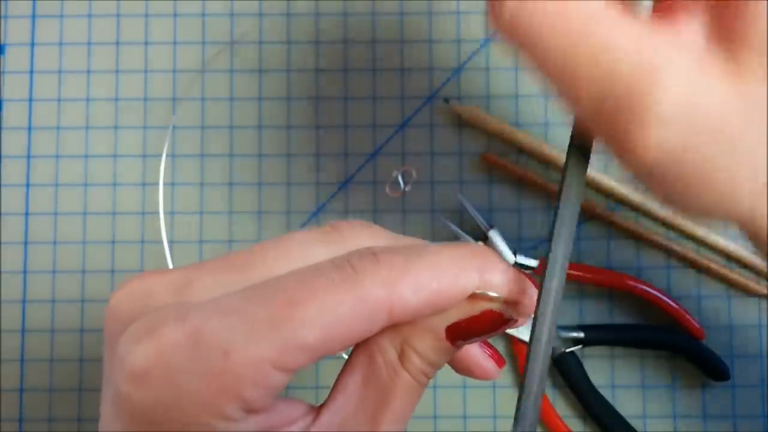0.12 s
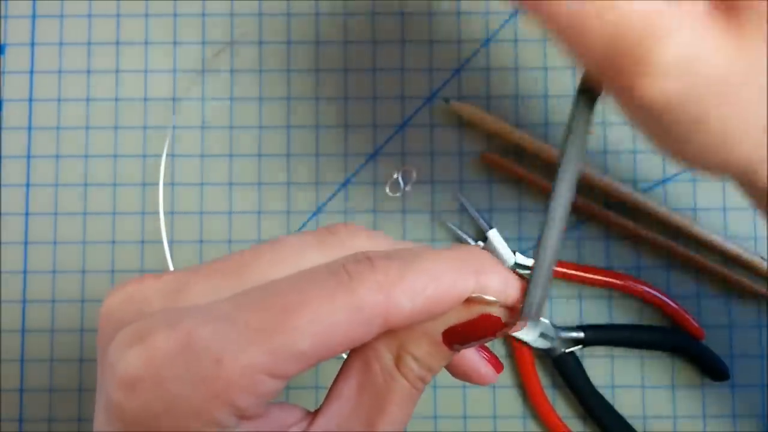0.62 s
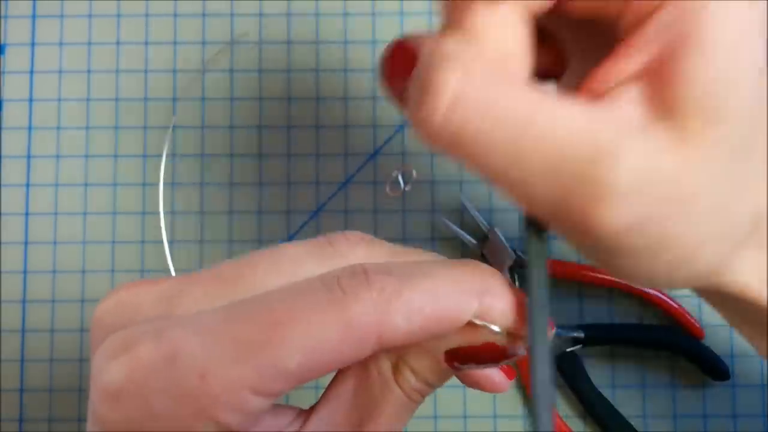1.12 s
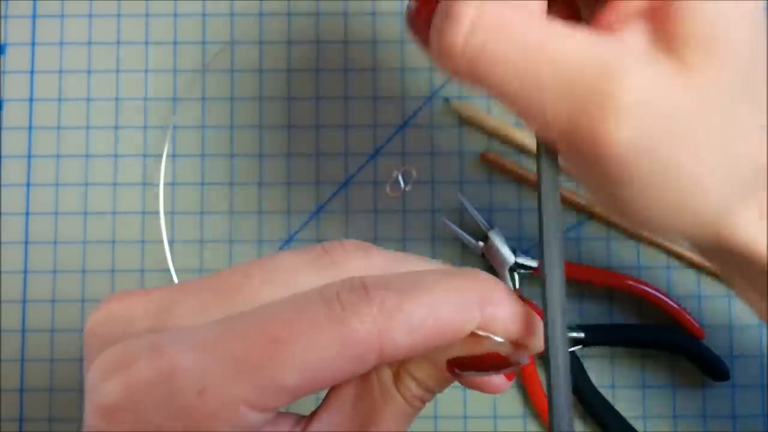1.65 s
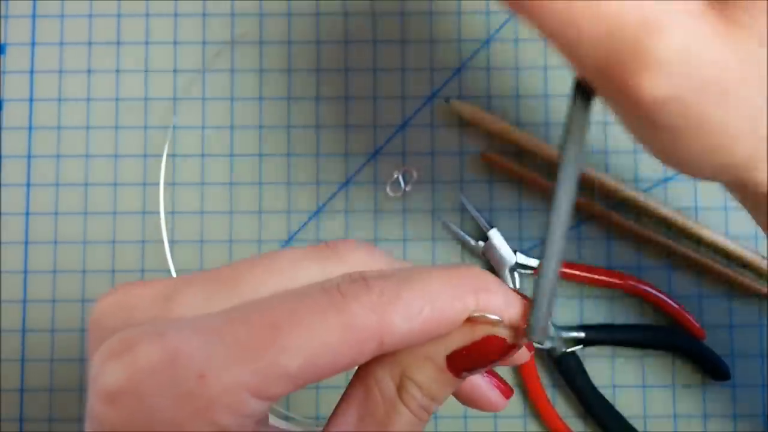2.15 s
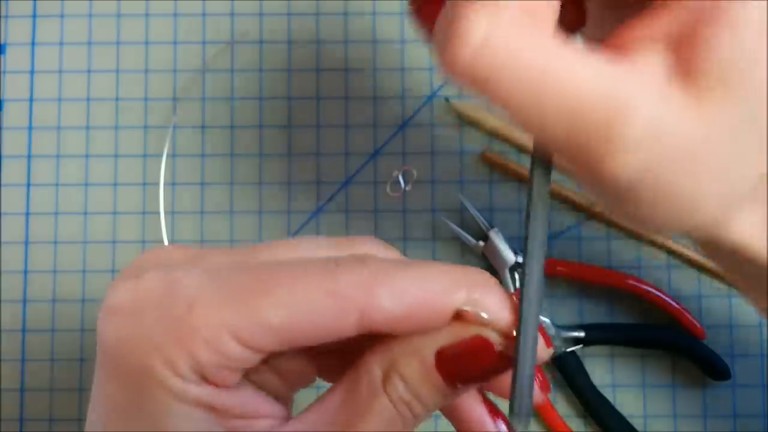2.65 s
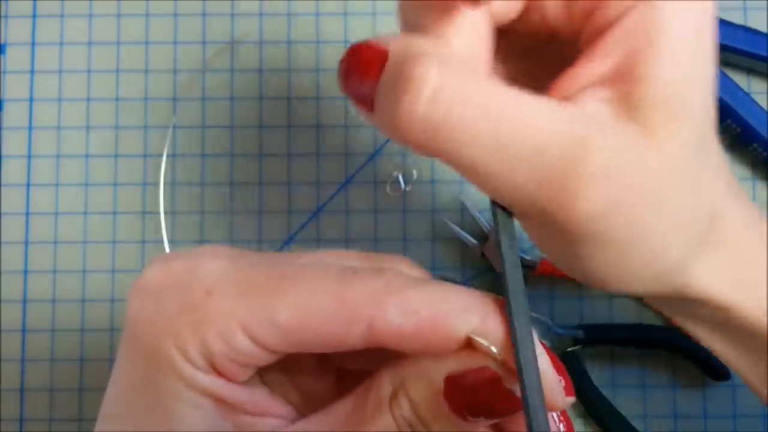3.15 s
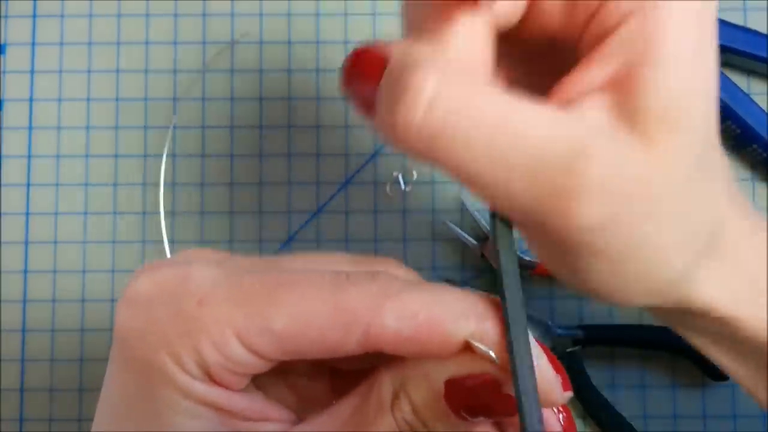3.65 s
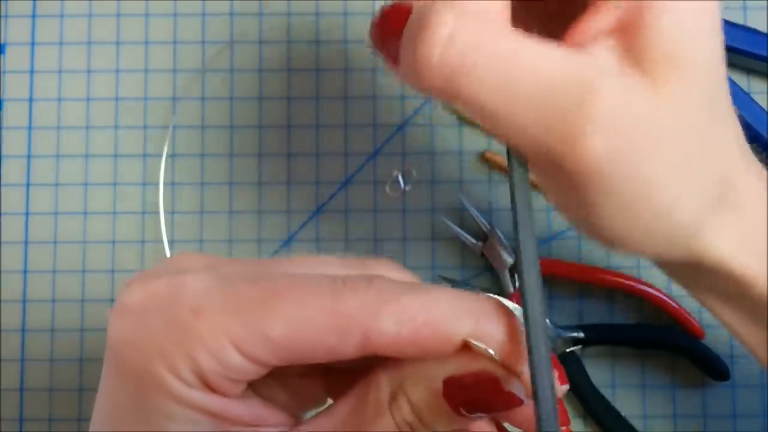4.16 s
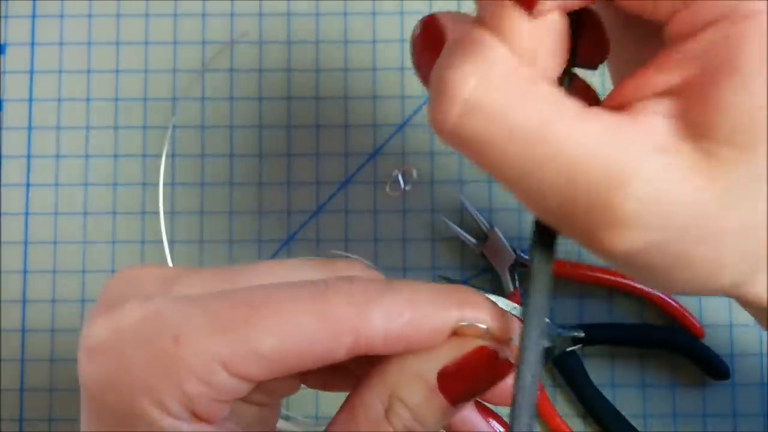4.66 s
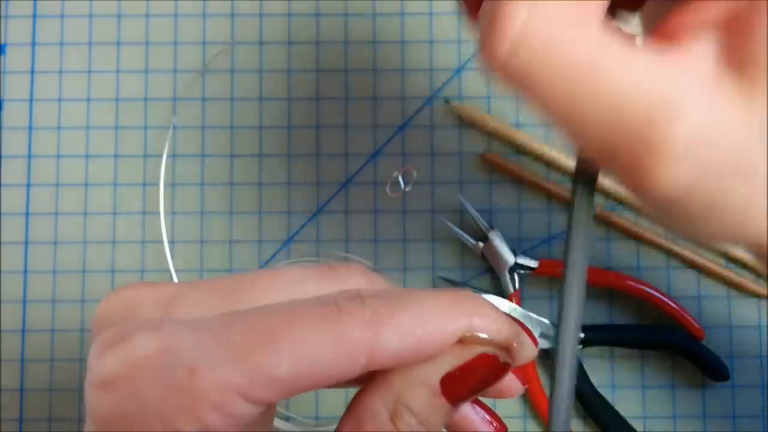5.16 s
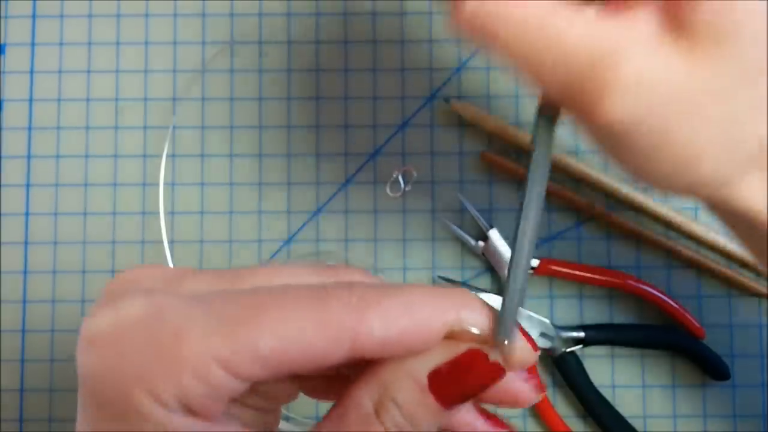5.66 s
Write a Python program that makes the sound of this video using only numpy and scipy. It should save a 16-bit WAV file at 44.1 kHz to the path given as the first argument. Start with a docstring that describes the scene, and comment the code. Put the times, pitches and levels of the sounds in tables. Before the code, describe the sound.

At a craft table in a small room, a small steel file rubs a cut wire end held in the fingers. Short, bright, gritty strokes come about three a second, each starting with a tick and fading quickly. Sharp catches and thin high rings colour some of them. A low rumble and faint hiss duck away between sounds. Close single microphone, dry, with very short table reflections.

```python
"""At a table in a room, a small steel file is pushed across a cut wire end held in the fingers,
about three strokes a second. Pressure-shaped tooth clicks and single catches or touches excite its scrape
and rings, a dull knock in the hand and short echoes off the table top; now and then the wire end buzzes.
Resonant low noise makes a rumble that swells and sinks, and filtered noise a faint hiss.
An expander turns everything down whenever the sound as a whole grows quiet."""
import sys
import numpy as np
from scipy import signal
from scipy.io import wavfile
from scipy.ndimage import uniform_filter1d, minimum_filter1d

SR = 44100
rng = np.random.default_rng(int(sys.argv[2]) if len(sys.argv) > 2 else 0)


def digitize_waveform(pressure):
    """Quantize a signal to 16-bit integers and store it at the path in sys.argv[1].

    Rows of a 2-D input are taken as channels; values are limited to [-1, 1].
    """
    field = np.atleast_2d(pressure).T
    bounded = np.clip(field, -1, 1)
    quanta = np.round(bounded * 32767).astype(np.int16)
    wavfile.write(sys.argv[1], SR, quanta)


def undo_db(level):
    """Turn decibels back into plain size, where 20 dB means ten times bigger."""
    steps = np.asarray(level, float) / 20
    return 10 ** steps


N = 255339

# the file lands on the wire: t/s
LANDING_TIMES = [0.0736, 0.3512, 0.68, 0.9816, 1.2621, 1.563, 1.8331, 2.146, 2.4478, 2.72, 3.0125, 3.861,
                 4.1284, 4.3864, 5.0648, 5.3907, 5.686]
# the stroke after each landing: length until the hand eases off/s, and relative levels:
# scrape level/dB, landing tick level/dB, knock in the hand level/dB
STROKE_SHAPES = [(0.11, -28.5, -20, -45), (0.14, -35, -15.5, -47.5), (0.096, -33, -22, -50),
                 (0.053, -30, -23.5, -42.5), (0.068, -36.5, -22.5, -42.5), (0.08, -32.5, -15, -39.5),
                 (0.11, -40, -25.5, -41.5), (0.11, -34.5, -30, -49.5), (0.093, -35, -19.5, -50),
                 (0.058, -28, -28, -46), (0.055, -45.5, -39, -63.5), (0.07, -36, -12, -41),
                 (0.068, -35, -17, -39.5), (0.098, -36.5, -29, -41.5), (0.088, -30, -11, -45.5),
                 (0.12, -34, -27.5, -50.5), (0.093, -34, -21, -48.5)]
# single catches and light touches of the file, hard and soft, mostly within the strokes:
# t/s, relative level/dB
SINGLE_CATCHES = [(0.0863, -15.5), (0.095, -8), (0.3681, -35), (0.378, -11), (0.3954, -23), (0.4123, 6),
                  (0.4325, -5), (0.4449, -7), (0.4728, -11), (0.708, -43), (0.9964, -29), (1.2997, -13),
                  (1.3111, -29), (1.3359, -10.5), (1.5333, -26), (1.849, -15.5), (2.1784, -18.5),
                  (2.1963, -23), (2.4599, -22), (2.4742, -7), (2.5076, -13), (2.739, -15.5), (3.879, -7),
                  (4.3964, -16), (4.8929, -25.5), (5.0713, -9.5), (5.0862, -6.5), (5.4314, -23),
                  (5.4377, -14), (5.448, -39), (5.7165, -20)]
# moments when the hollow of the hand hums and the wire end buzzes:
# t/s, hollow gain/dB, clear tone f/Hz, clear tone level/dB, tone half length/s
HUM_MOMENTS = [(1.04, 8.5, 544, -65, .04), (3.065, 23.5, 520, -58, 0.05), (4.198, 6, 555.5, -45.5, .035),
               (4.472, 9.5, 534, -44, 0.043), (5.775, 0, 523, -44.5, .09)]


def evened(x):
    """Normalisation: scales a signal to unit rms."""
    return x / np.sqrt(np.mean(x ** 2) + 1e-20)


def unit_energy(taps):
    """Normalisation: scales an impulse response to unit energy."""
    return taps / np.linalg.norm(taps)


def colour(points):
    """Minimum phase: causal taps follow from a magnitude spectrum (f/Hz, level/dB) by Hilbert transform."""
    f, db = np.transpose(points)
    hz = abs(np.fft.fftfreq(8192, 1 / SR))
    log_gain = np.interp(np.log(hz + 1), np.log(f + 1), db) * np.log(10) / 20
    spectrum = np.exp(np.conj(signal.hilbert(log_gain)))
    return np.fft.ifft(spectrum).real[:4096]


def through(x, taps):
    """Linear filtering: convolution with an impulse response, cut to length."""
    return signal.oaconvolve(x, taps)[:N]


def bumps(rows, half_s):
    """Superposition in dB: sums triangles (t/s, level/dB) of the given half widths."""
    t = np.arange(N) / SR
    halves = half_s * np.ones(len(rows))
    return sum(db * np.maximum(1 - abs(t - s) / half, 0) for (s, db), half in zip(rows, halves))


def rumble():
    """Resonance: noise in a few steep low peaks, each held fairly steady, shares one slow, dipping swell."""
    # peaks of the rumble: f/Hz, width of one filter pass/Hz, relative level/dB
    boom_peaks = [(57.2, 13.44, 6), (84, 110, -12), (120.6, 18.3, -4), (205.9, 28, -16.5)]
    # the slow swell ahead of the dips: t/s, level/dB
    rumble_swell = [(0.0, -44), (0.2, -34.5), (0.55, -39.5), (0.76, -36.5), (1.05, -41.5), (1.212, -37),
                    (1.65, -40), (1.97, -39.5), (2.2, -40.5), (2.6, -40.5), (2.9, -36), (3.2, -43.5),
                    (3.669, -37), (3.9, -43.5), (4.35, -37), (4.62, -42.5), (4.86, -34.5), (5.15, -47),
                    (5.5, -37), (5.74, -40)]
    # the rumble dips briefly: t/s, depth as level/dB, half width/s
    rumble_dips = [(0.307, -9, 0.051), (0.666, -10, 0.057), (0.878, -20, 0.14), (1.129, -12, 0.074),
                   (1.734, -11, 0.068), (1.791, -15, 0.018), (2.002, -4, 0.02), (2.083, -12.5, 0.076),
                   (2.291, -10.5, 0.088), (2.394, -7, 0.061), (2.581, -6.5, 0.029), (2.688, -7.5, 0.034),
                   (3.151, -5, 0.014), (3.227, -6.5, 0.046), (3.31, -18, 0.035), (3.564, -6, 0.078),
                   (3.748, -10, 0.063), (4.039, -12, 0.034), (4.24, -5.5, 0.047), (4.525, -4, 0.034),
                   (4.746, -6, 0.031), (5.027, -7.5, 0.078), (5.267, -3, 0.036), (5.32, -8, 0.016)]
    boom = 0
    for hz, width, db in boom_peaks:
        peak = signal.iirpeak(hz, hz / width, SR)
        once = signal.lfilter(*peak, rng.standard_normal(N + SR))
        tone = evened(signal.lfilter(*peak, once)[SR:])  # leaves out the first second of build-up
        power = uniform_filter1d(uniform_filter1d(tone ** 2, 600), 600)
        boom = boom + undo_db(db) * tone / np.sqrt(power + 0.06)
    s, db = np.transpose(rumble_swell)
    dips = np.array(rumble_dips)
    level_db = np.interp(np.arange(N) / SR, s, db) + bumps(dips[:, :2], dips[:, 2])
    return evened(boom) * undo_db(level_db)


def air():
    """Stationary noise: steady room tone and microphone hiss, coloured by a fixed spectrum."""
    # spectrum of room tone and hiss: f/Hz, relative level/dB per Hz
    air_spectrum = [(30, 4), (90, -3.5), (250, -11.5), (600, -13.5), (1500, -18), (3500, -24),
                    (8000, -24.5), (16000, -27)]
    level_db = -49.5
    return undo_db(level_db) * evened(through(rng.standard_normal(N), colour(air_spectrum)))


def strokes():
    """Contact force: pressure builds, sags and lifts; shares of it reach the scrape, two rings and the hand."""
    rise_s, sag_db, ease_db_per_s, lift_s = 0.04, -2.5, -650, 0.051
    light_db, hard_db, hard_share = -17.5, -36, 0.22  # a hard landing starts nearer full pressure
    bounce_s, bounce_db = 0.004, -2.5  # the file bounces back a little just after it lands
    lower_share, upper_share, knock_share = 0.65, 0.9, 0.42  # how far each follows the pressure in dB
    stick_s, stick_db = 0.012, -7  # the scrape and rings sink just before a catch or touch
    t, out = np.arange(N) / SR, np.zeros((4, N))
    for s, (length, top_db, landing_db, knock_db) in zip(LANDING_TIMES, STROKE_SHAPES):
        first_db = min(light_db + hard_share * (landing_db - hard_db), 0)
        times = [0, bounce_s, min(rise_s, .9 * length), length, length + lift_s]
        levels_db = [first_db, first_db + bounce_db, 0, sag_db, sag_db + ease_db_per_s * lift_s]
        shape_db = np.interp(t - s, times, levels_db)
        paths_db = [top_db + shape_db, top_db + lower_share * shape_db,
                    top_db + upper_share * shape_db, knock_db + knock_share * shape_db]
        out += undo_db(np.array(paths_db)) * (t >= s) * (t < s + length + lift_s)
    stuck = sum(np.clip(1 + (t - s) / stick_s, 0, 1) * (t < s) for s, _ in SINGLE_CATCHES)
    out[:3] *= undo_db(stick_db * stuck)
    return out


def teeth(per_s, spread_db, chatter_db, chatter_s):
    """Random impulse train: uneven tooth clicks, loud and soft in clumps as the wire chatters."""
    size = undo_db(spread_db * np.minimum(rng.exponential(1, N), 5))
    size = size * (rng.random(N) < per_s / SR)
    chatter = evened(uniform_filter1d(rng.standard_normal(N), max(round(chatter_s * SR), 2)))
    return evened(size * rng.choice([-1., 1.], N) * undo_db(chatter_db * chatter))


def catches():
    """Stick-slip: a landing, catch or touch lets go in a few quick, fading skips, also heard as dry ticks."""
    bite_db = 0.5  # the landing tick stands out over the light first touch
    snags, ticks = np.zeros(N), np.zeros(N)
    skid = undo_db(-60 * np.arange(900) / SR / .045)  # 60 dB down in 45 ms, cut off after 20 ms
    landings = [(s, row[2] + bite_db) for s, row in zip(LANDING_TIMES, STROKE_SHAPES)]
    for s, db in landings + SINGLE_CATCHES:
        skips = 0.63 * skid * rng.standard_normal(900) * (rng.random(900) < .04)
        skips[0] = 1
        start = round(s * SR)
        part = ticks[start:][:900]
        part += undo_db(db - 12.5) * (skid * skips)[:len(part)]
        part = snags[start:][:900]
        part += undo_db(db - 4.5) * skips[:len(part)]
    return snags, ticks


def ring(drive, table, shift_db, shift_s):
    """Modal decay: unit-energy modes, each driven by an input whose level wanders at random."""
    t, out = np.arange(4096) / SR, np.zeros(N)
    span = max(round(shift_s * SR), 2)
    for hz, width, db in table:
        # the contact slides along, so a mode is struck more or less
        shift = evened(uniform_filter1d(uniform_filter1d(rng.standard_normal(N), span), span))
        mode = np.exp(-np.pi * width * t) * np.cos(2 * np.pi * hz * t)
        out += through(drive * undo_db(db + shift_db * shift), unit_energy(mode))
    return out


def file_rings(lower_drive, upper_drive):
    """Variable coupling: two rings of the file sound more or less freely as the grip shifts."""
    # the lower ring: f/Hz, width/Hz, relative level/dB
    lower_modes = [(7460, 200, -4), (7720, 230, -4)]
    # the upper ring: f/Hz, width/Hz, relative level/dB
    upper_modes = [(13240, 340, 2), (12960, 200, -3.5)]
    # freedom of the grip: t/s, lower ring relative level/dB, upper ring relative level/dB,
    # lean as level/dB, added to the higher mode of the lower ring and taken from the other
    grip_shifts = [(0.1, -12, -11, 1), (1.0, -9, -11.5, 1), (1.898, -3.5, -4, 1.5), (2.8, -14, -10.5, 12),
                   (3.9, -15, -13, 1.5), (4.45, -14.5, -10, 7.5), (5.1, -10.5, -13.5, 5.5),
                   (5.7, -16.5, -4, 10.5)]
    # moments when the rings of the file stand out or sink: t/s, lower ring gain/dB, upper ring gain/dB
    singing = [(0.788, 6, 10.5), (1.916, 7, 7.5), (1.946, -7, 12), (5.141, -1, 1), (5.464, 7.5, 4.5),
               (5.753, 14.5, -4)]
    sing_s = 0.033  # half width
    t, grip, sings = np.arange(N) / SR, np.transpose(grip_shifts), np.array(singing)
    lower_db, upper_db = (np.interp(t, grip[0], grip[k]) + bumps(sings[:, [0, k]], sing_s) for k in (1, 2))
    lean = undo_db(np.interp(t, grip[0], grip[3]))
    lower = lower_drive * undo_db(lower_db - 1.5)
    upper = upper_drive * undo_db(upper_db - 1.0)
    sound = np.zeros(N)
    for mode, share in zip(lower_modes, (1 / lean, lean)):
        sound += ring(lower * share, [mode], shift_db=-2.5, shift_s=0.01)
    return sound + ring(upper, upper_modes, shift_db=-1.5, shift_s=0.0093)


def desk(x):
    """Early reflections: echoes off table top and tools smear each click, changing as the file moves."""
    echo_db, start_s, t60_s, dull_hz = 0.5, 0.00098, 0.047, 8840
    count, turns_per_s = 9, 2.8  # echo patterns, and how often the round of them repeats
    t, out = np.arange(SR // 5) / SR, x.copy()
    turn = np.pi * turns_per_s * np.arange(N) / SR
    for k in range(count):
        tail = rng.standard_normal(len(t)) * (rng.random(len(t)) < .2)
        tail = tail * (t > start_s) * undo_db(-60 * t / t60_s)
        tail = signal.lfilter(*signal.butter(1, dull_hz, fs=SR), tail)
        # each pattern fades in and out; 12870/65536 is the mean of cos^16
        share = np.sqrt(65536 / (12870 * count)) * np.cos(turn + np.pi * k / count) ** 8
        out += through(x * share, undo_db(echo_db) * unit_energy(tail))
    return out / np.sqrt(1 + undo_db(2 * echo_db))


def hand(rub):
    """Cavity resonance: rubbing gives a dull knock in the hand and rings the hollow of the fingers."""
    # spectrum of the knock: f/Hz, relative level/dB per Hz
    knock_spectrum = [(90, -41.5), (200, -1), (330, -5.5), (700, -9), (1100, -8), (1900, -10.5),
                      (3500, -18)]
    # hollow of the fingers: f/Hz, width/Hz, relative level/dB
    hollow_modes = [(525, 86, 1), (416, 42, -32.5)]
    hum_s = 0.036  # half width
    hollow = undo_db(-10 + bumps(np.array(HUM_MOMENTS)[:, :2], hum_s))
    dull = through(rub, unit_energy(colour(knock_spectrum))) * undo_db(0.85)
    return dull + ring(rub * hollow, hollow_modes, shift_db=0.5, shift_s=0.016)


def filing():
    """Source and filter: clicks under each stroke drive the broad scrape, the file's rings and the hand."""
    # spectrum of the scrape: f/Hz, relative level/dB per Hz
    scrape_spectrum = [(1000, -37), (1700, -10.5), (2640, -7.5), (2980, -6), (6030, -11), (7550, -9.5),
                       (8610, -2.5), (12800, -2), (16000, 5)]
    # modes of the file: f/Hz, width/Hz, relative level/dB
    file_modes = [(2700, 300, -23), (4290, 220, -17), (5650, 320, -17), (8540, 260, -19), (10300, 170, -17),
                  (12000, 220, -18)]
    press, low, high, knock = strokes()
    scrape = unit_energy(colour(scrape_spectrum))
    clicks = teeth(per_s=5000, spread_db=4.0, chatter_db=2.5, chatter_s=0.0039)
    # the hand feels an even rubbing
    rub = knock * teeth(per_s=8000, spread_db=3.0, chatter_db=0.64, chatter_s=0.0036)
    burrs = press * teeth(per_s=500, spread_db=2.0, chatter_db=1.0, chatter_s=0.0046)
    snags, ticks = catches()
    snags = snags / abs(scrape).max()  # evens out the peak of the scrape filter
    drive = press * clicks + snags
    sound = through(drive, scrape) * undo_db(-1.0)
    sound += ring(drive * undo_db(-4.0), file_modes, shift_db=5.0, shift_s=0.024)
    sound += file_rings(low * clicks + undo_db(3.5) * snags, high * clicks + snags)
    sound = desk(sound)
    bright = signal.butter(2, 6500, "high", fs=SR, output="sos")
    sound += signal.sosfilt(bright, burrs * undo_db(-0.5) + ticks)  # dry, bright single ticks
    return sound + hand(rub) + tones()


def tones():
    """Periodic vibration: the wire end buzzes evenly, a tone and its octave swelling, fading and sinking."""
    fade_db, octave_db, sink_hz_per_s = -13, -10, -150  # fade_db is reached at the half length
    t, out = np.arange(N) / SR, np.zeros(N)
    for s, _, hz, db, half in HUM_MOMENTS:
        since = t - s
        turn = 2 * np.pi * (hz * since + sink_hz_per_s * since ** 2 / 2 + rng.random())
        swell = undo_db(db + fade_db * (since / half) ** 2)
        out += np.sqrt(2) * swell * (np.sin(turn) + undo_db(octave_db) * np.sin(2 * turn))
    return out


def scene():
    """Superposition: file, rumble and air add at one microphone."""
    return (filing() + rumble() + air())[None]


def band_limit(x):
    """A steep low-pass at the top of the band."""
    return signal.sosfilt(signal.butter(12, 16980, fs=SR, output="sos"), x)


def record(dry):
    """Downward expansion: gain opens quickly and closes gradually below a soft knee; then band limits."""
    knee_db, floor_db, release_db_per_s, smooth_s = -34.5, -24, 326.0, 0.00023
    power = abs(signal.lfilter(np.ones(40) / 40, 1, dry[0] ** 2))
    level_db = 10 * np.log10(power + 1e-12)
    level_db = -minimum_filter1d(-level_db, size=361, origin=180)  # holds each peak for 8 ms
    fall = np.arange(N) * release_db_per_s / SR
    held_db = np.maximum.accumulate(level_db + fall) - fall
    # far below the knee the gain falls about 2.3 dB for each dB of level
    under_db = -1.5 * 1.61 * np.logaddexp(0, -(held_db - knee_db) / 1.04)
    gain = undo_db(np.maximum(under_db, floor_db))
    keep = np.exp(-1 / (smooth_s * SR))
    opened = dry * signal.lfilter([1 - keep], [1, -keep], gain)
    opened = signal.sosfilt(signal.butter(2, 46, "high", fs=SR, output="sos"), opened)  # bass cut
    treble_cut = signal.firwin(401, 15800, window=("kaiser", 4), fs=SR)
    mix = signal.oaconvolve(opened, treble_cut[None], "same")
    return band_limit(mix)


dry = scene()
out = record(dry)
digitize_waveform(out)
```